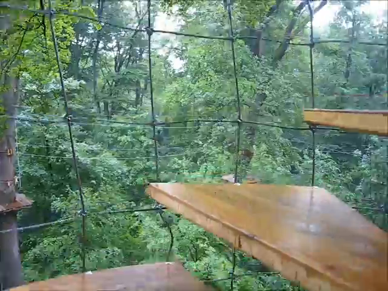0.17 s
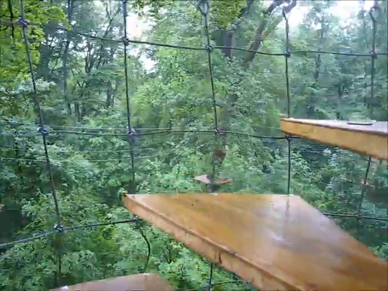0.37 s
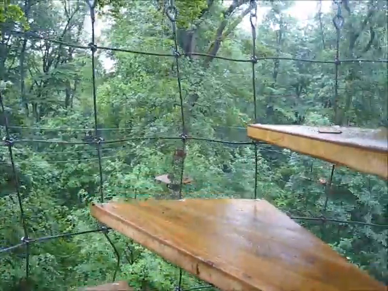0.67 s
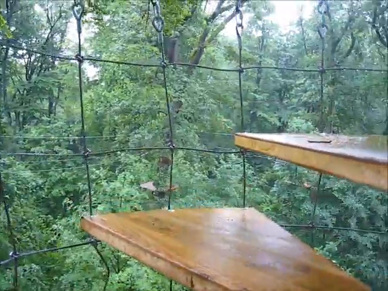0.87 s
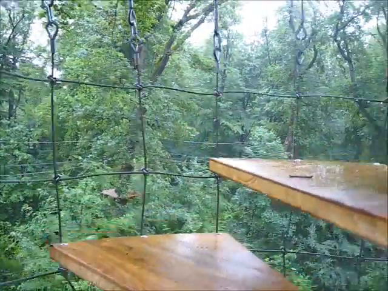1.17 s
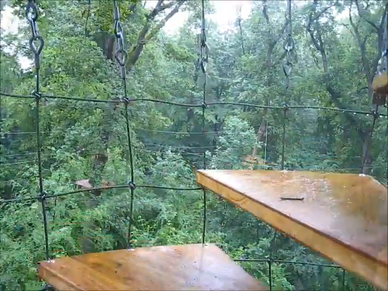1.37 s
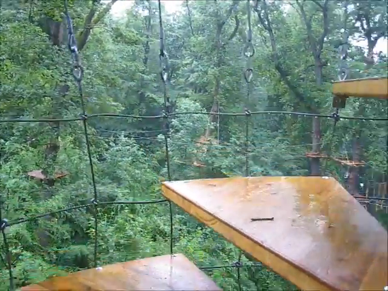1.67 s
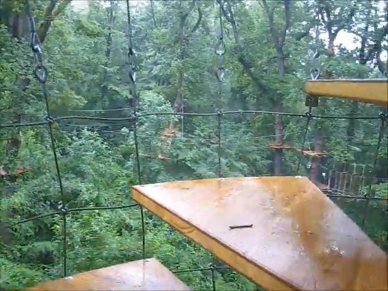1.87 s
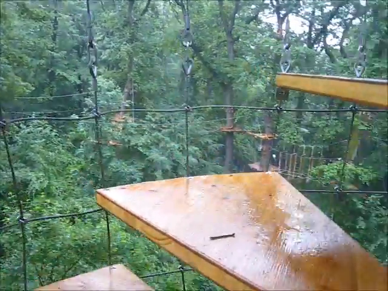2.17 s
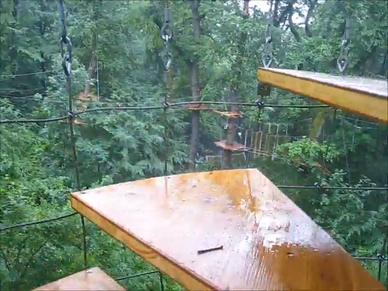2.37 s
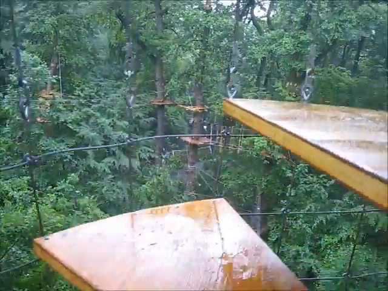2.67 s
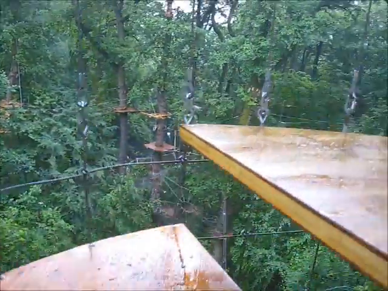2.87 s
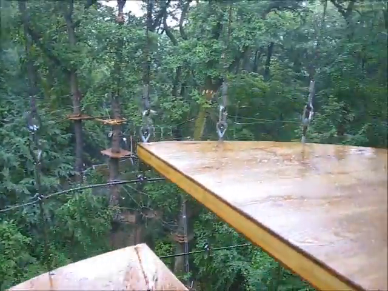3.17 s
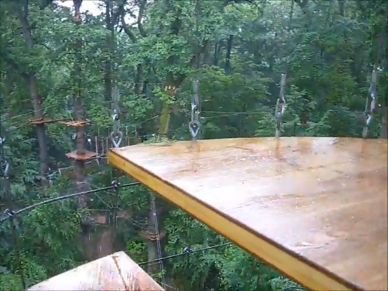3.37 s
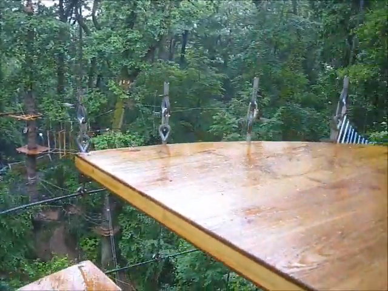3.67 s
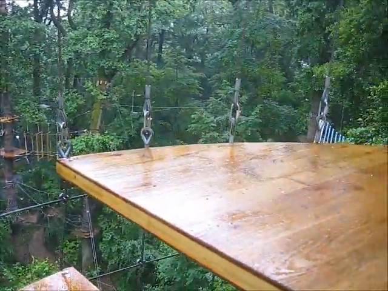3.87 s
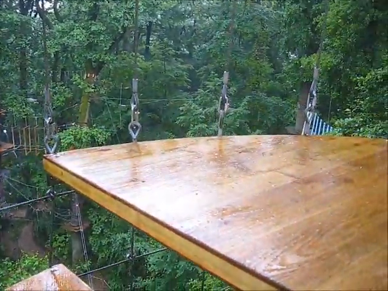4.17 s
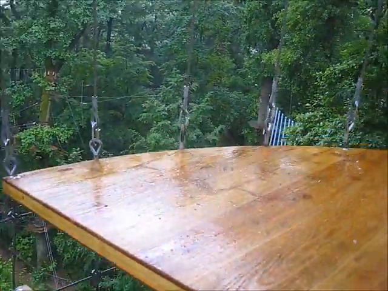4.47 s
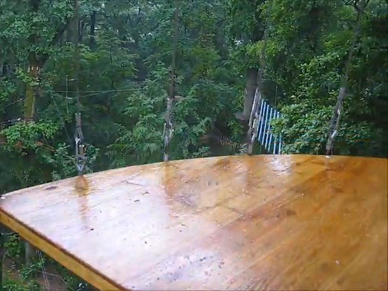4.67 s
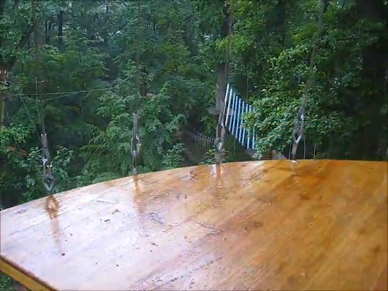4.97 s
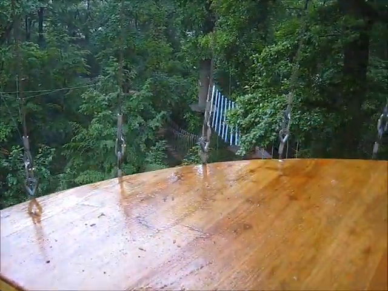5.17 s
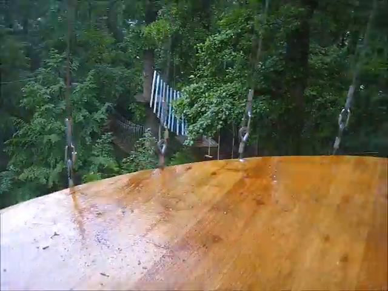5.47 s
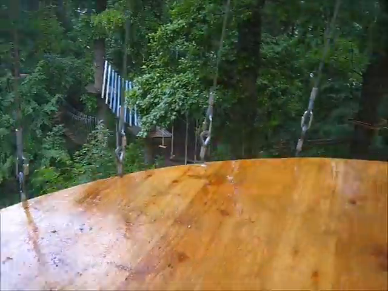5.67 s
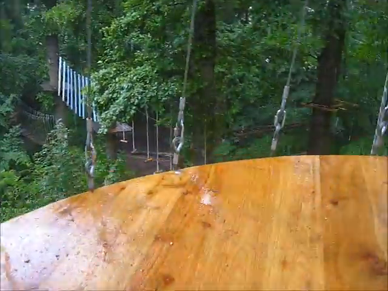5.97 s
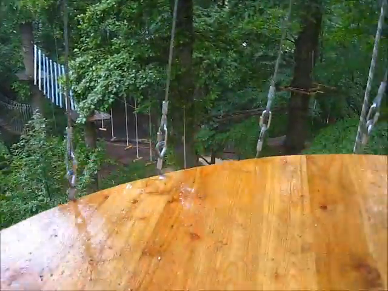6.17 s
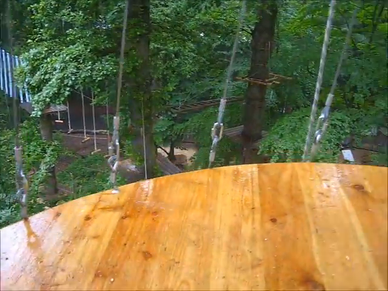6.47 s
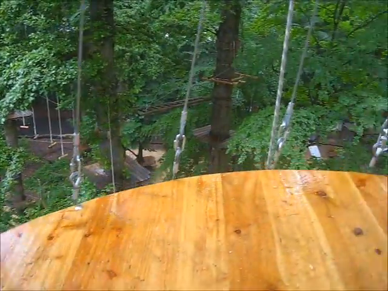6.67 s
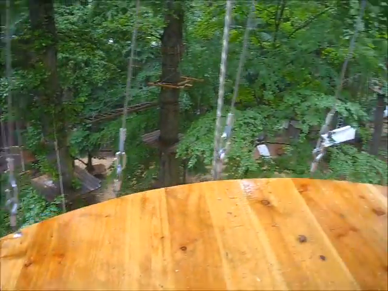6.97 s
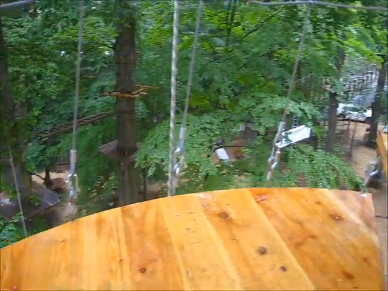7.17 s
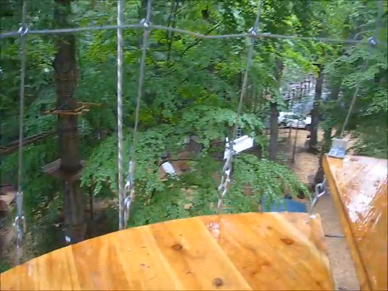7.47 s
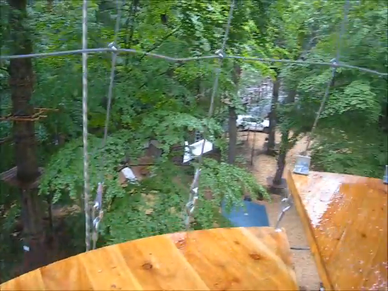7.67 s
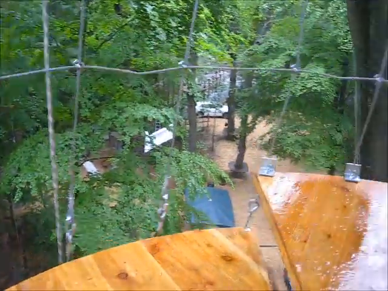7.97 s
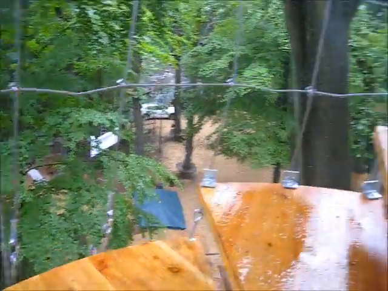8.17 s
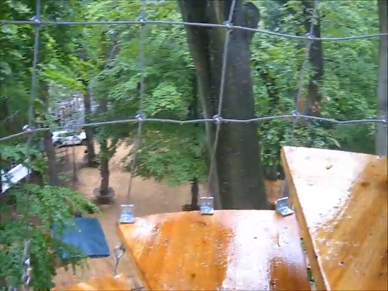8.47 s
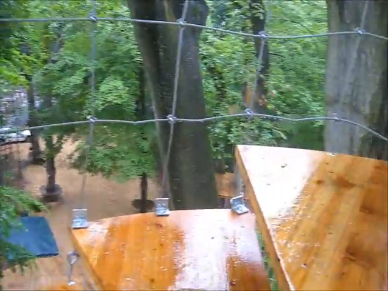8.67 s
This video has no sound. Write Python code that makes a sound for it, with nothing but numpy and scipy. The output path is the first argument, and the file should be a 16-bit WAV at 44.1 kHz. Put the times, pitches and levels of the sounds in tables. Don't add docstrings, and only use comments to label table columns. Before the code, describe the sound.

Steady rain falls in a dense forest, heard from a wet wooden platform among the trees. A wide, even hiss on leaves and fine pattering continue throughout. Sparse soft taps come first, then heavy drops land very close with dull thumps, sharp clicks, woody knocks and tiny wet splashes, thickest in the middle and thinner later. The close microphone dips briefly after loud hits.

```python
import sys
import numpy as np
from scipy import signal
from scipy.fft import rfft, irfft, next_fast_len
from scipy.io import wavfile
from scipy.ndimage import uniform_filter1d, minimum_filter1d, map_coordinates

SR = 44100
rng = np.random.default_rng(int(sys.argv[2]) if len(sys.argv) > 2 else 0)


def to_wav(s):
    ch = np.atleast_2d(s).T
    pcm = np.round(np.clip(ch, -1, 1) * 32767)
    wavfile.write(sys.argv[1], SR, pcm.astype(np.int16))


def magnitude_from_level(level_db):
    exponent = np.asarray(level_db, float) / 20
    return 10 ** exponent


N = 388521


def unit(x):
    return x / np.sqrt(np.mean(x ** 2) + 1e-20)


def peak(x):
    return x / np.max(np.abs(x))


def noise(count):
    return rng.standard_normal(count)


def curves(rows):
    s, *columns = np.transpose(rows)
    return [np.interp(np.arange(N) / SR, s, column) for column in columns]


def wobble(rate):
    knots = noise(int(N * rate / SR) + 4)
    return map_coordinates(knots, [np.arange(N) * rate / SR])


def coloured(x, spectrum):
    m = next_fast_len(N + 8192)
    hz, db = np.transpose(spectrum)
    bins_hz = np.fft.rfftfreq(m, 1 / SR)
    gain = magnitude_from_level(np.interp(np.log(bins_hz + 1), np.log(hz + 1), db))
    return unit(irfft(rfft(x, m) * gain, m)[:N])


def band(x, lo_hz, hi_hz):
    edges = [lo_hz, min(hi_hz, SR / 2.1)]
    return signal.sosfilt(signal.butter(2, edges, "bandpass", fs=SR, output="sos"), x)


def highpass(cutoff_hz):
    return signal.butter(2, cutoff_hz, "highpass", fs=SR, output="sos")


def add(track, s, sound):
    part = track[max(round(s * SR), 0):][:len(sound)]
    part += sound[:len(part)]


def fade(t, t60, rise):
    return (1 - np.exp(-t / rise)) * magnitude_from_level(-60 * t / max(t60, .001))


def patchy(depth_db):
    z = signal.stft(noise(N), nperseg=512)[2]
    field = uniform_filter1d(rng.standard_normal(z.shape), size=8, axis=0)
    field = uniform_filter1d(field, size=8, axis=1)
    return unit(signal.istft(z * magnitude_from_level(depth_db * unit(field)), nperseg=512)[1][:N])


def patter(count, spread_db, centre_hz, octaves, cycles):
    when, rank, pitch = rng.random((count, 3)).T
    hz = np.clip(centre_hz * 2 ** (octaves * (2 * pitch - 1)), 200, SR / 2.5)[:, None]
    size = magnitude_from_level(-spread_db * np.log(1.01 - rank))[:, None]
    k = np.arange(200)
    turns = hz * k / SR
    grain = size * np.sin(2 * np.pi * turns) * np.exp(-turns / cycles)
    at = (when * N).astype(int)[:, None] + k
    return unit(np.bincount(at.ravel(), grain.ravel(), N + len(k))[:N])


# start_s [s], hiss_db [dB], spray_db [dB]
SHOWER = [(0, -26, 1), (.45, -25.5, -.5), (1.35, -26.5, .8), (1.8, -26, -.3), (2.75, -26, 0),
          (4.05, -26.3, -0.2), (4.7, -26, 0), (5.6, -25.5, -1), (6.4, -26.5, 0.5), (7, -26.3, -0.5),
          (8.05, -26.3, 0.5), (8.81, -26.5, 0.5)]
# pitch_hz [Hz], level_db [dB]
LEAF_COLOUR = [(290, -49), (500, -12), (1040, -4), (2370, 1), (4110, 1), (10600, -14), (13000, -18),
               (15700, -28.5)]
# pitch_hz [Hz], level_db [dB]
MURMUR_COLOUR = [(12, -45), (20, -9), (75, -6), (300, -7), (1030, -0.5), (1200, -4.5), (1560, -31),
                 (2640, -120)]


def rain():
    hiss_db, spray_db = curves(SHOWER)
    mean_db = np.mean(hiss_db)
    low_db = mean_db - 11.5 + .5 * (hiss_db - mean_db)
    swell_db = .2 * wobble(2.5) + .4 * wobble(11)
    near = magnitude_from_level(-13.5) * patter(count=12000, spread_db=3.5, centre_hz=4250, octaves=1.51, cycles=0.45)
    crackle = patter(count=1500, spread_db=3.5, centre_hz=11100, octaves=0.34, cycles=1.8)
    crackle = magnitude_from_level(2 * spray_db - 15.5) * crackle
    leaves = coloured(patchy(depth_db=0.63) + near + crackle, LEAF_COLOUR)
    treble = signal.sosfiltfilt(highpass(6500), leaves)
    leaves = leaves + (magnitude_from_level(spray_db) - 1) * treble
    leaves = magnitude_from_level(hiss_db + 0.73 + swell_db) * leaves
    lumps = magnitude_from_level(-17) * patter(count=2500, spread_db=0.5, centre_hz=500, octaves=1.25, cycles=2.0)
    low = coloured(patchy(depth_db=1.1) + lumps, MURMUR_COLOUR)
    return leaves + magnitude_from_level(low_db + .13 + .5 * wobble(7)) * low


# start_s [s], peak_db [dB], pitch_hz [Hz], mist_db [dB] of the finest mist
BURSTS = [(1.276, -6.5, 4400, -15), (1.8517, -9, 3300, -30), (2.0353, -12, 4600, -28),
          (2.1934, -8, 3200, -15), (2.7052, 0.5, 3130, -5), (3.373, -1.5, 3720, -2), (3.438, -9, 2300, -28),
          (3.8701, -7, 3760, -12), (4.237, -4, 2750, -26), (4.322, -9, 3330, -24), (4.496, -5.5, 3550, -13),
          (4.577, -7, 4300, -22), (4.7165, -6, 3600, -17), (4.9112, -16, 4600, -15),
          (4.988, -2.5, 3080, -7), (5.1364, -13, 3500, -26), (5.4984, -9, 3200, -32),
          (5.62, -5.5, 4500, -15), (5.8715, -7, 3000, -14), (6.279, -7.5, 3220, -30),
          (6.6284, -14, 2880, -10), (6.879, -6, 2840, -13), (8.4225, -8, 4000, -8),
          (8.4324, -11, 4720, -24)]
# start_s [s], peak_db [dB]
MIST_TICKS = [
    (.8589, -20),
    (1.937, -24),
    (2.0542, -17),
    (2.7322, -14),
    (3.483, -20),
    (4.5176, -20),
    (6.2447, -23),
    (8.2556, -13),
]


def splashes():
    out, t = np.zeros(N), np.arange(SR // 12) / SR
    t60 = 0.022
    for s, db, hz, _ in BURSTS:
        ring = 0.58 * np.sin(2 * np.pi * hz * t) + unit(band(noise(len(t)), hz * 0.47, hz * 1.6))
        spray = band(band(noise(len(t)), 6200, 11400), 4600, 12400)
        spray = magnitude_from_level(-11) * peak(spray * fade(t, 0.82 * t60, 0.00074))
        add(out, s + .0002, magnitude_from_level(db - 6.5) * (peak(ring * fade(t, t60, 0.001)) + spray))
    for s, db in MIST_TICKS + [(row[0], row[-1]) for row in BURSTS]:
        tick = band(band(noise(len(t)), 7000, 13000), 6500, 15000)
        add(out, s, magnitude_from_level(db - 9) * peak(tick * fade(t, 0.0087, 0.00033)))
    return out


# crest_s [s], peak_db [dB], pitch_hz [Hz], upper_db [dB], upper_hz [Hz] of the upper mode
SKIN_BLOWS = [(0.4635, -11, 304, -10, 340), (0.8333, -24, 300, 8, 480), (1.7665, -12.5, 200, -2, 328),
              (1.9846, -1, 247, -4, 366), (3.238, -5.5, 181, 9, 754), (4.6884, -15, 318, 11, 450),
              (5.2598, -10, 222, 1, 398), (5.2671, -15.5, 318, -3, 420), (5.5034, -16.5, 308, 5, 500),
              (5.538, -21, 314, 8, 500), (6.0495, -24, 260, 19, 440), (6.859, -4.5, 242, -10, 500),
              (6.878, -13, 207, -4, 370), (7.2786, -20, 290, 18, 710), (8.1877, -20.5, 252, 0, 430),
              (8.5522, -9.5, 235, 8, 482)]


def thumps():
    out, t = np.zeros(N), np.arange(SR // 7) / SR
    lead = .0016
    for s, db, hz, upper_db, upper_hz in SKIN_BLOWS:
        t60, upper_t60 = 17.2 / hz, 8.4 / upper_hz
        low_fade = fade(t, 0.17 * t60, 0.0014) + 0.14 * fade(t, t60, .0012)
        low = np.cos(2 * np.pi * hz * (t - lead)) * low_fade
        upper = np.cos(2 * np.pi * upper_hz * (t - lead)) * fade(t, upper_t60, 0.0019)
        flutter = magnitude_from_level(-22) * unit(band(noise(len(t)), 50, 700)) * fade(t, 1.8 * t60, .004)
        add(out, s - lead, magnitude_from_level(db - 0.55) * peak(low + magnitude_from_level(upper_db) * upper + flutter))
    return out


def struck(rows, blur_db, rise, least_s, cycles):
    out, t = np.zeros(N), np.arange(SR // 10) / SR
    for s, db, hz in rows:
        t60 = least_s + cycles / hz
        lo_hz, hi_hz = hz * 0.47, hz * 2.08
        blur = band(band(noise(len(t)), lo_hz, hi_hz), lo_hz, hi_hz)
        ring = magnitude_from_level(blur_db) * unit(blur) - np.sin(2 * np.pi * hz * t)
        add(out, s + 0.00017, magnitude_from_level(db + 0.5) * peak(ring * fade(t, t60, rise)))
    return out


# start_s [s], peak_db [dB], pitch_hz [Hz]
BARE_IMPACTS = [(1.9829, -6.5, 1100), (2.7084, -3, 1700), (2.7325, -16, 12500), (3.2357, -7, 2100),
                (3.4833, -17, 3200), (3.8, -9, 2700), (4.3219, -7, 3600), (4.578, -1, 2900),
                (4.2, -12, 1900), (4.7178, -16, 5000), (3.8722, -12, 2100), (5.5, -11, 1800),
                (4.9885, -10, 4500), (5.2625, -11, 780), (5.622, -8, 2300), (5.8735, -13, 1600),
                (5.5025, -15, 900), (6.8575, -5, 700), (9.3, -7, 4000)]


def clicks():
    return struck(BARE_IMPACTS, blur_db=-14, rise=.00008, least_s=.0005, cycles=4)


# start_s [s], peak_db [dB], pitch_hz [Hz]
CONTACTS = [(1.9832, -8, 1890), (1.9832, -9, 790), (2.7062, -8, 3940), (3.4385, -20.5, 610),
            (3.2362, -18, 420), (3.3748, -13, 2300), (3.3748, -8.5, 4100), (3.38, -17, 1090),
            (4.3268, -18.5, 740), (4.58, -11, 1000), (5.2568, -11, 1310), (5.2655, -16, 1030),
            (5.266, -14, 1900), (5.8735, -20, 1800), (6.8577, -20, 710), (6.8579, -12, 1910),
            (6.963, -19, 1720), (8.5506, -18, 800), (8.5508, -29, 1600)]


def snaps():
    return struck(CONTACTS, blur_db=-8, rise=0.00052, least_s=0.0056, cycles=8.6)


# start_s [s], peak_db [dB], pitch_hz [Hz]
BOARD_HITS = [(.691, -16, 940), (1.28, -13, 1140), (1.44, -19.5, 1610), (1.639, -19, 1940),
              (1.987, -12, 1720), (2.499, -16, 1970), (2.64, -16, 1550), (2.708, -15, 1760),
              (3.374, -12, 1500), (3.44, -11, 1390), (3.49, -16, 620), (3.872, -9, 2270),
              (4.239, -12.5, 1290), (4.326, -10, 1340), (4.584, -14.5, 635), (4.717, -12, 1240),
              (4.913, -24, 1760), (4.991, -13.5, 1260), (5.057, -17, 1180), (5.501, -11, 1100),
              (5.536, -18, 1120), (5.622, -13.5, 1160), (5.872, -15.5, 747), (7.2, -22, 1130),
              (7.29, -19, 1050), (7.641, -19, 1200), (8.423, -16, 1140), (8.707, -15, 2120)]


def knocks():
    return struck(BOARD_HITS, blur_db=1.0, rise=0.00044, least_s=0.017, cycles=24)


# start_s [s], peak_db [dB], pitch_hz [Hz]
AFTER_RINGS = [
    (2.7095, -18, 993),
    (1.281, -20, 1140),
    (1.999, -19, 383),
    (3.8725, -12, 3640),
    (4.327, -11.5, 1410),
    (6.862, -16, 484),
    (8.5508, -20, 505),
    (8.556, -18, 225),
]


def rings():
    return struck(AFTER_RINGS, blur_db=-9, rise=.0008, least_s=.025, cycles=28)


# start_s [s], peak_db [dB], pitch_hz [Hz]
LEAF_HITS = [(.287, -25, 780), (.431, -27, 1110), (.697, -17, 1100), (.729, -22, 1120), (1.366, -25, 1080),
             (1.5, -21, 834), (1.839, -22.5, 1056), (2.387, -25, 674), (2.679, -24, 694), (5.12, -23, 1660),
             (5.698, -23, 815), (5.849, -23, 1170), (6.493, -24, 1130), (7.028, -23, 830),
             (7.332, -25, 872), (3.877, -22, 1350)]


def pats():
    return struck(LEAF_HITS, blur_db=3, rise=.0018, least_s=.028, cycles=12)


# start_s [s], peak_db [dB], start_hz [Hz], end_hz [Hz], length_s [s]
TRAPPED_AIR = [
    (.4672, -7, 2030, 1780, 0.011),
    (3.4883, -10, 1100, 940, 0.00274),
    (4.9121, -10, 1900, 1500, 0.0023),
    (0.968, -26, 2200, 2270, .024),
    (6.9633, -13, 3500, 3170, 0.0029),
]


def squeaks():
    out = np.zeros(N)
    for s, db, start_hz, end_hz, length in TRAPPED_AIR:
        u = np.arange(round(length * SR)) / (length * SR)
        turn = 2 * np.pi * np.cumsum(start_hz + (end_hz - start_hz) * u) / SR
        whistle = np.sin(turn) + 0.13 * np.cos(2 * turn)
        add(out, s, magnitude_from_level(db) * np.sin(np.pi * u) ** 0.32 * whistle)
    return out


# pitch_hz [Hz], width_hz [Hz], level_db [dB]
MACHINERY = (60, 18, -61)


def hum():
    hz, width_hz, db = MACHINERY
    return magnitude_from_level(db) * unit(band(noise(N), hz - width_hz / 2, hz + width_hz / 2))


# start_s [s], bands [count]
FLICKERS = [(.166, 1), (1.652, 1), (1.675, 1), (2.441, 1), (2.743, 1), (3.022, 2), (3.068, 3), (3.951, 3),
            (4.763, 2), (5.46, 1), (6.203, 2), (6.342, 1), (6.714, 1), (6.783, 3), (7.155, 3), (7.317, 1),
            (8.107, 2), (8.177, 1)]


def side_flickers(mono):
    side, size = np.zeros(N), 2048
    hz = np.fft.rfftfreq(size, 1 / SR)
    window = np.sin(np.pi * np.arange(size) / size) ** 2
    for s, count in FLICKERS:
        other = mono[rng.integers(N - size):][:size]
        lo_hz = rng.uniform(4100, 14300, (count, 1))
        chosen = ((hz > lo_hz) & (hz < lo_hz + 1500)).any(axis=0)
        add(side, s, .85 * window * irfft(rfft(other) * chosen))
    return side


def scene():
    drops = splashes() + thumps() + clicks() + snaps() + knocks() + rings() + pats() + squeaks()
    return np.tile(rain() + drops + hum(), (2, 1))


def top_cut(x):
    return signal.sosfilt(signal.butter(12, 16360, fs=SR, output="sos"), x)


def record(dry):
    dry = signal.sosfilt(highpass(38), dry)
    power = uniform_filter1d(band(dry[0], 400, 5000) ** 2, size=353, origin=176)
    heard = np.sqrt(np.abs(power))
    need = np.maximum(heard / magnitude_from_level(-16.5), 1) ** -.8
    need = minimum_filter1d(need, size=661, origin=330)
    keep = np.exp(-1 / (SR * 0.0099))
    x = dry * (1 + signal.lfilter([1 - keep], [1, -keep], need - 1))
    x = x / (1 + np.abs(x / .99) ** 6) ** (1 / 6)
    x = irfft(rfft(x) * (np.fft.rfftfreq(N, 1 / SR) < 15830), N)
    mix = x + side_flickers(x[0]) * [[1], [-1]]
    return top_cut(mix)


dry = scene()
out = record(dry)
to_wav(out)
```